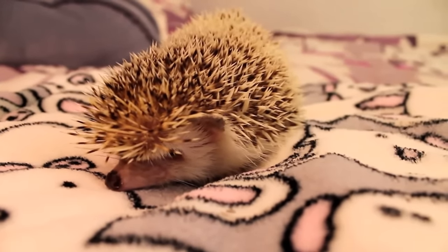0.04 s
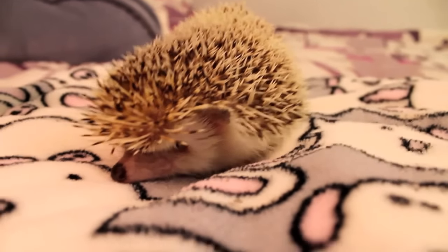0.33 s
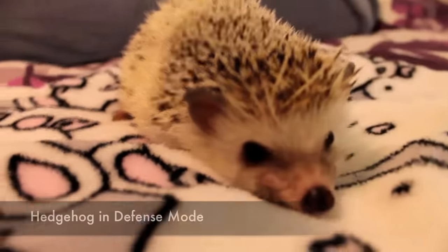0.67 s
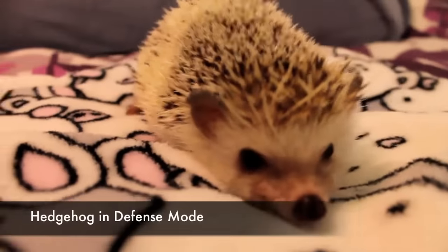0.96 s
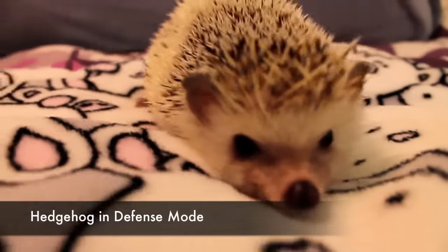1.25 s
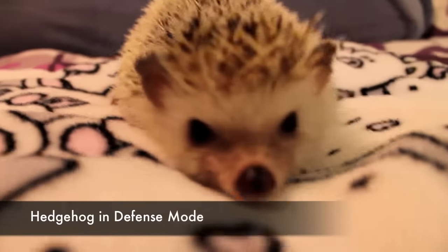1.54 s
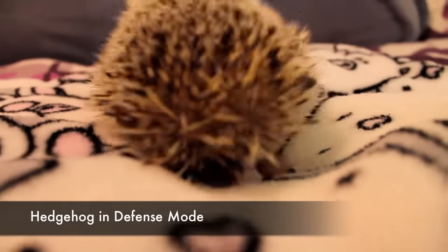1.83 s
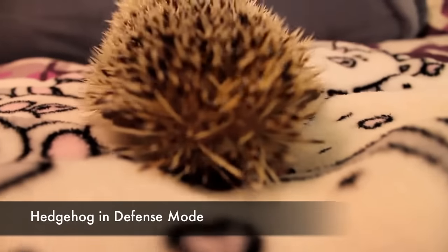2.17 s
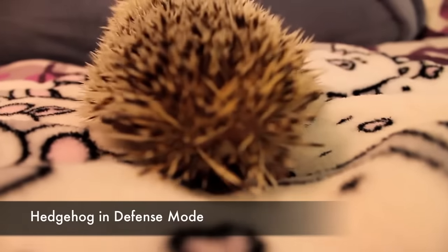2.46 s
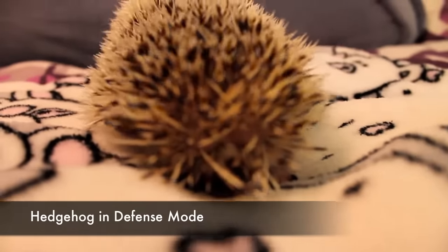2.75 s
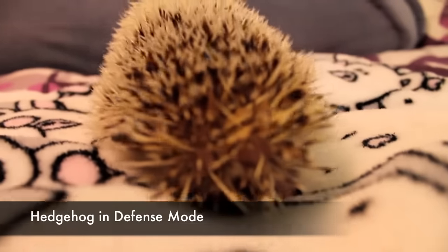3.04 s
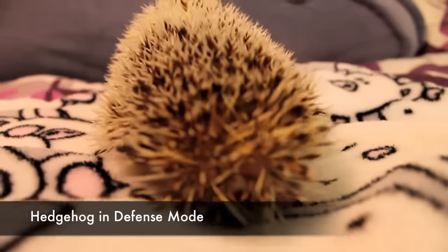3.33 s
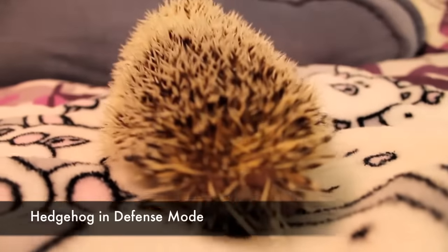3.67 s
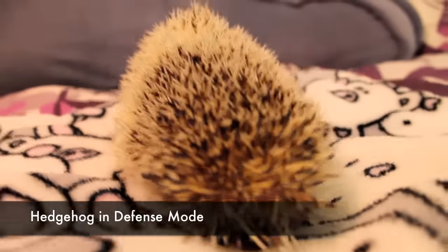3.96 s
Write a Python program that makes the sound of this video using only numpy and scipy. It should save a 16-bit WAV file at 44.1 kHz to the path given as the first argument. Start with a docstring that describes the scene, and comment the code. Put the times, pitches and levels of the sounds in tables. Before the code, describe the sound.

A hedgehog huffs close to the microphone in a quiet room. After a soft blanket scuff and a few ticks come two long, hissing huffs, then quick short puffs alternating with thinner sniffs, over a low hum.

```python
"""A faint deep rumble opens a quiet room; after a gap, a low murmur and hum fade in. A hedgehog scuffs
its blanket, makes a few soft ticks, then curls up and huffs: two long hard huffs, then short puffs,
with thinner sniffs in between. Each huff is air forced through the nose: the airway flaps in a fast,
uneven pulse train while turbulence adds a rush and a hiss. The sniffs are turbulence alone.
Friction between the quills adds faint rustles and one brief scrape."""
import sys
import numpy as np
from scipy import signal
from scipy.fft import rfft, irfft
from scipy.io import wavfile

SR = 44100
rng = np.random.default_rng(int(sys.argv[2]) if len(sys.argv) > 2 else 0)


def waveform_to_disk(signal):
    """Save audio, clipped to [-1, 1], as 16-bit WAV at the path in sys.argv[1]."""
    frames = np.transpose(np.atleast_2d(signal))
    scaled = np.clip(frames, -1, 1) * 32767
    samples = np.round(scaled).astype(np.int16)
    wavfile.write(sys.argv[1], SR, samples)


N = 176400
T = np.arange(N) / SR

# Spectra of the room's rumble and murmur: frequency_hz, relative_db
RUMBLE_SPECTRUM = [(20, -4), (42, 4.5), (65, -2), (100, -5), (150, -13.5), (230, -22), (330, -34),
                   (550, -42.5), (2000, -45.5), (15000, -46.5)]
MURMUR_SPECTRUM = [(22, -18), (38, -28.5), (55, -1), (66, -26), (71, -9), (80, -3), (150, 2), (210, -3),
                   (290, 0.5), (380, -7.5), (800, -14), (1600, -21), (4000, -28), (9000, -37), (15000, -44)]
# Envelope of the murmur: time_s, level_db
MURMUR_ENVELOPE = [(0.498, -100), (0.512, -66.5), (.66, -62), (.95, -57.5), (1.25, -54.5), (1.8, -51.5),
                   (2.6, -51.5), (4, -53.5)]
# Tones of the room's hum: pitch_hz, relative_db
HUM_TONES = [(53.8, -85.5), (118.4, -55), (285.3, -54.5)]

# Friction spectra of the cloth and the quills: frequency_hz, relative_db
SCUFF_SPECTRUM = [(400, 0), (800, 0), (1900, -5), (3000, -15), (8000, -30)]
RUSTLE_SPECTRUM = [(2500, 8), (4200, -1), (7600, -5), (8500, 2.5), (9400, -9), (13000, -7.5), (15300, -10)]
SCRAPE_SPECTRUM = [(1000, -6), (2000, -1), (4800, 3.5), (6300, -5), (7700, 2), (8500, -3), (9000, -20),
                   (11500, -12), (13000, -26), (15000, -34)]
# Quills brushing together: start_s, end_s, level_db
RUSTLES = [(1.208, 1.34, -70), (1.63, 1.708, -69.5), (1.748, 1.83, -65), (3.183, 3.296, -73),
           (3.722, 3.794, -67.5)]
# Modes that ring on after the scrape: pitch_hz, peak_db, t60_s
SCRAPE_MODES = [(1560, -51, 0.095), (2160, -51, 0.089)]

# Ticks as the animal shifts: start_s, ring_db, pitch_hz, snap_relative_db
TICKS = [(1.0089, -43, 1980, -12), (1.0631, -47, 1600, -10.5), (1.0824, -45.5, 2100, -12),
         (1.1076, -48, 1970, -12), (1.2245, -37, 1720, -13), (1.2765, -45.5, 3800, -14)]
# Spectrum of a tick's snap: frequency_hz, relative_db
SNAP_SPECTRUM = [(400, -5), (1700, -12), (3800, 8), (5200, -11), (7000, -2), (10000, -27), (15000, -36)]
# Spectrum of a tick's tail around its pitch: pitch_ratio, relative_db
TAIL_SPECTRUM = [(.25, 3.5), (.7, -1), (1, 0), (1.3, -3.5), (2, -20), (6, -46)]

# Inward breaths: start_s, end_s, level_db
SNIFFS = [(2.06, 2.287, -53.5), (2.485, 2.691, -52.5), (2.789, 2.908, -53.5), (3.006, 3.11, -54.5),
          (3.196, 3.305, -55), (3.397, 3.489, -54.5), (3.568, 3.67, -57), (3.74, 3.831, -56.5),
          (3.902, 3.992, -57.5)]
# Course of the two long huffs, hard then softer: time_s, push_db, hiss_db, flutter_hz
LONG_HUFFS = [(1.80, -70, -77, 249.8), (1.822, -50.5, -59, 248.8), (1.848, -53, -55, 258.9),
              (1.867, -41, -42, 285.7), (1.902, -44, -46, 245.5), (1.958, -41, -43, 298.5),
              (1.994, -38, -41.5, 335.2), (2.052, -41.5, -43.5, 300.7), (2.068, -68, -76, 259),
              (2.089, -100, -100, 259.7), (2.268, -100, -100, 250.8), (2.305, -49.5, -52.5, 255),
              (2.415, -47.5, -52, 273.9), (2.462, -42, -45.5, 320), (2.48, -49, -50.5, 280.2),
              (2.494, -59, -84, 264.4)]
# Short outward puffs: start_s, end_s, push_db, hiss_db, swell_db
PUFFS = [(2.697, 2.782, -46.5, -51, -3.5), (2.909, 3, -49, -53, 2), (3.112, 3.197, -48.5, -54.5, 0),
         (3.308, 3.392, -49, -54.5, -1), (3.492, 3.562, -49, -54.5, 0), (3.673, 3.735, -49, -56.5, -4.5),
         (3.828, 3.895, -49, -56.5, -3.5)]
# Spectra of the airway's pulses and turbulence: frequency_hz, relative_db
SNIFF_SPECTRUM = [(200, -9), (400, 6.5), (1050, 3.5), (1550, -14), (2000, 7.5), (2300, 3), (2700, -5),
                  (3300, -13.5), (4400, 0), (5500, -5.5), (6800, -3), (7700, -15), (10000, -25.5),
                  (15000, -28)]
FLUTTER_SPECTRUM = [(100, -11), (200, -0.5), (310, 0), (480, -6), (900, -2), (1200, -7), (1600, -30.5),
                    (3000, -64)]
RUSH_SPECTRUM = [(150, -16), (300, 7), (600, -0.5), (1000, 4.5), (1280, 0.5), (1600, -15), (2600, -32)]
PUFF_HISS_SPECTRUM = [(1820, -7), (3100, -13), (3450, -11), (4400, 7.5), (5350, 0), (6720, 6.5),
                      (8170, -12), (9100, -10), (11800, -29), (13200, -14), (15500, -47)]
HUFF_HISS_SPECTRUM = [(940, -44), (1600, -14), (2170, 3.5), (2910, -5.5), (3020, -8), (3230, -8),
                      (3660, -10), (4380, 6.5), (5610, -2.5), (6780, 4), (7740, -8), (11600, -18.5),
                      (15500, -30)]
JET_SPECTRUM = [(5000, -20), (8000, 10), (10000, 4), (13500, 6), (15500, -5)]


def from_db(db):
    """Amplitude grows tenfold for every 20 dB."""
    return 10 ** (np.asarray(db) / 20)


def filtered(source, spectrum):
    """Linear filtering multiplies the source's spectrum by a response curve; rms 1."""
    hz, db = np.transpose(spectrum)
    bins_hz = np.maximum(np.arange(N // 2 + 1) * SR / N, 1)
    bass_rolloff = np.minimum(bins_hz / hz[0], 1) ** 4
    response = from_db(np.interp(np.log(bins_hz), np.log(hz), db))
    return unit_rms(irfft(rfft(source) * bass_rolloff * response, N))


def unit_rms(x):
    """Dividing by the root mean square gives unit power."""
    return x / np.sqrt(np.mean(x ** 2) + 1e-20)


def noise(spectrum):
    """White noise takes on the spectrum of its filter; rms 1."""
    return filtered(rng.standard_normal(N), spectrum)


def drift(rate_hz):
    """Interpolating between random values gives a continuous fluctuation; rms 1."""
    return unit_rms(np.interp(T * rate_hz, np.arange(4000), rng.standard_normal(4000)))


def burst(start, end, attack_s, release_s, swell_db=0):
    """An amplitude envelope with rounded edges and a hold that slopes by swell_db."""
    edges = np.clip((T - start) / attack_s, 0, 1) * np.clip((end - T) / release_s, 0, 1)
    progress = np.clip((T - start) / (end - start), 0, 1)
    return np.sin(edges * np.pi / 2) * from_db(swell_db * (progress - .5))


def room(rumble_db=-64.5, hum_gain_db=-3, waver=0.13):
    """Superposition of low noise and modulated tones: a rumble, a gap, then murmur and wavering hum."""
    times, db = np.transpose(MURMUR_ENVELOPE)
    level = from_db(np.interp(T, times, db)) * (T > times[0])
    hum = sum(from_db(tone_db) * np.sin(2 * np.pi * hz * T + drift(5)) * (1 + waver * drift(9))
              for hz, tone_db in HUM_TONES)
    rumble = from_db(rumble_db) * burst(0, 0.3416, 0.004, 0.027) * noise(RUMBLE_SPECTRUM)
    murmur = level * noise(MURMUR_SPECTRUM)
    return rumble + murmur + level / level.max() * from_db(hum_gain_db) * hum


def blanket_scuff(start_s=.858, end_s=.895, level_db=-63):
    """Sliding friction of a paw on cloth makes a soft, dull noise."""
    return from_db(level_db) * burst(start_s, end_s, .015, 0.021) * noise(SCUFF_SPECTRUM)


def quill_rustles(grain_db=3.5):
    """Uneven friction between rising quills makes a faint, grainy treble."""
    motion = sum(from_db(db) * burst(start, end, 0.014, .03) for start, end, db in RUSTLES)
    grain = from_db(grain_db * drift(600))
    return motion * unit_rms(grain * noise(RUSTLE_SPECTRUM))


def quill_scrape(start_s=3.8925, end_s=3.902, scratch_db=-50.5):
    """Brief friction between quills makes a bright scratch and leaves two modes in free decay."""
    age = np.maximum(T - start_s, 0)
    ring = sum(from_db(db - 60 * age / t60) * np.sin(2 * np.pi * hz * age) for hz, db, t60 in SCRAPE_MODES)
    scratch = from_db(scratch_db) * burst(start_s, end_s, 0.00066, 0.0066) * noise(SCRAPE_SPECTRUM)
    return ring + scratch


def ticks(ring_t60_s=.008, snap_decay_s=0.0014, tail_decay_s=0.0066, tail_db=-9.5):
    """Damped vibration: each tick's snap, short ring and rough tail decay exponentially."""
    out, snap_noise = np.zeros(N), noise(SNAP_SPECTRUM)
    for start, ring_db, hz, snap_db in TICKS:
        age = np.maximum(T - start, 0)
        ring = np.sin(2 * np.pi * hz * age) * from_db(-60 * age / ring_t60_s)
        snap = snap_noise * from_db(snap_db) * np.exp(-age / snap_decay_s)
        tail_noise = noise([(hz * ratio, db) for ratio, db in TAIL_SPECTRUM])
        tail = tail_noise * from_db(tail_db) * np.exp(-age / tail_decay_s)
        out += from_db(ring_db) * (T > start) * (ring + snap + tail)
    return out


def sniffs(flicker_db=1.0):
    """Turbulence in air drawn in through the nose makes broadband noise without flutter."""
    flow = sum(from_db(db) * burst(start, end, 0.011, 0.004, swell_db=-1.5) for start, end, db in SNIFFS)
    return flow * from_db(flicker_db * drift(120)) * noise(SNIFF_SPECTRUM)


def nasal_resonance(centre_hz=2152, half_width_hz=295):
    """Cavity resonance in the nose favours one band of turbulence, here filtered twice; rms 1."""
    radius = np.exp(-2 * np.pi * half_width_hz / SR)
    b, a = [1, 0, -1.1], [1, -2 * radius * np.cos(2 * np.pi * centre_hz / SR), radius ** 2]
    return unit_rms(signal.lfilter(b, a, signal.lfilter(b, a, rng.standard_normal(N))))


def airway_flutter(rate_hz, period_jitter=.09, spread_db=1.2):
    """Flow-driven oscillation: each flap of the airway is a pulse, uneven in time and strength; rms 1."""
    timing, strength = rng.standard_normal((2000, 2)).T
    flap_cycles = np.cumsum(1 + period_jitter * timing)
    onsets = np.searchsorted(np.cumsum(rate_hz) / SR, flap_cycles)
    impulses = np.zeros(N)
    impulses[onsets[onsets < N]] = from_db(spread_db * strength[onsets < N])
    return filtered(impulses, FLUTTER_SPECTRUM)


def huffs(puff_flutter_hz=271.2, hz_per_db=6, throb_depth=0.19, nose_db=-57, jet_exponent=2.2):
    """Source and filter: forced air makes pulses and a low rush, and the pulses modulate a nasal hiss."""
    times, huff_push_db, huff_hiss_db, huff_hz = np.transpose(LONG_HUFFS)
    push = from_db(np.interp(T, times, huff_push_db, left=-120, right=-120))
    huff_hiss = from_db(np.interp(T, times, huff_hiss_db, left=-120, right=-120))
    puffing, puff_hiss = np.zeros(N), np.zeros(N)
    for start, end, push_db, hiss_db, swell_db in PUFFS:
        envelope = burst(start, end, 0.031, .022, swell_db)
        puffing += envelope
        push += from_db(push_db) * envelope
        puff_hiss += from_db(hiss_db) * envelope
    effort_db = np.maximum(20 * np.log10(push / from_db(-48)), -6)
    puff_hz = puff_flutter_hz + hz_per_db * effort_db   # a harder puff flutters faster
    pulses = airway_flutter(np.where(T < times[-1], np.interp(T, times, huff_hz), puff_hz))
    throb = unit_rms(np.maximum(1 + throb_depth * pulses, 0))
    body = push * (from_db(-2) * pulses + from_db(-3.5) * noise(RUSH_SPECTRUM))
    nose = from_db(nose_db) * puffing * nasal_resonance()
    # The jet's bright edge stands out only when the push is hardest.
    jet = from_db(-55.5) * (push / from_db(-39)) ** jet_exponent * noise(JET_SPECTRUM)
    hiss = puff_hiss * noise(PUFF_HISS_SPECTRUM) + huff_hiss * noise(HUFF_HISS_SPECTRUM)
    return body + throb * (nose + hiss + jet)


def scene():
    """Sound pressures add in one channel: the animal close by, the room behind."""
    return (huffs() + sniffs() + ticks() + blanket_scuff() + quill_scrape() + quill_rustles() + room())[None]


def record(dry):
    """An elliptic low-pass filter cuts the treble steeply above 15.7 kHz."""
    return signal.sosfilt(signal.ellip(10, .1, 80, 15700, fs=SR, output="sos"), dry)


dry = scene()
out = record(dry)
waveform_to_disk(out)
```